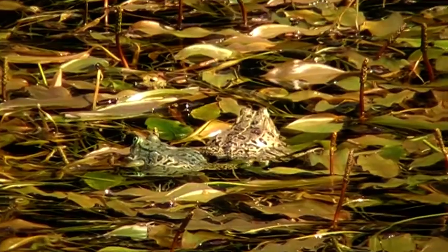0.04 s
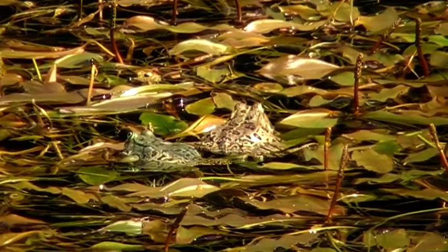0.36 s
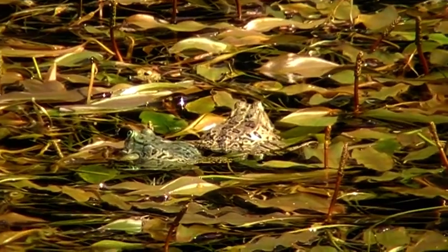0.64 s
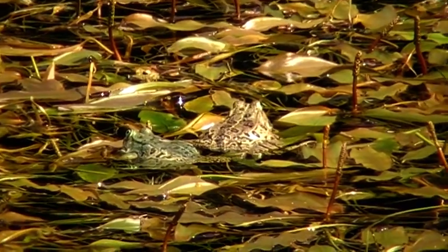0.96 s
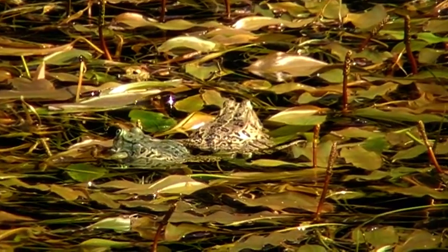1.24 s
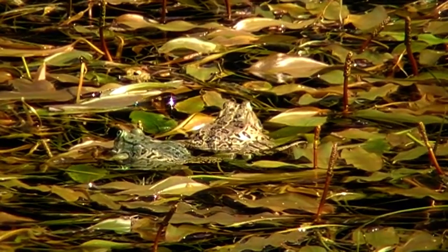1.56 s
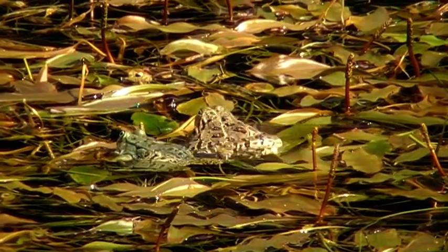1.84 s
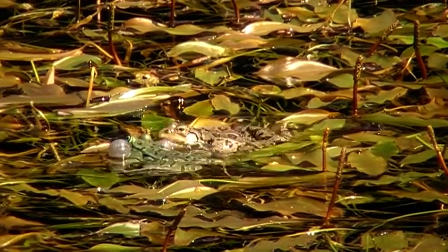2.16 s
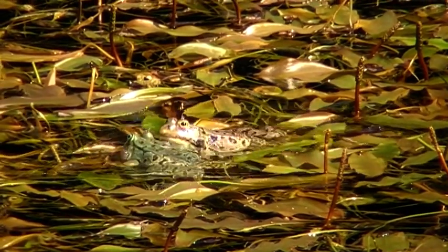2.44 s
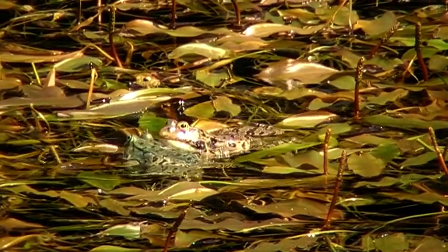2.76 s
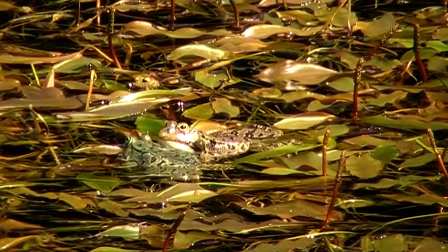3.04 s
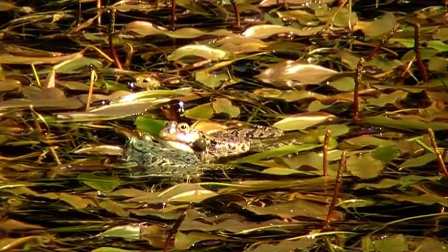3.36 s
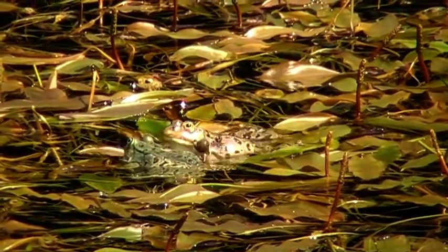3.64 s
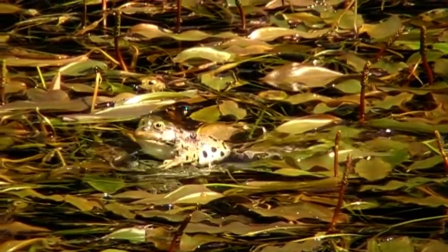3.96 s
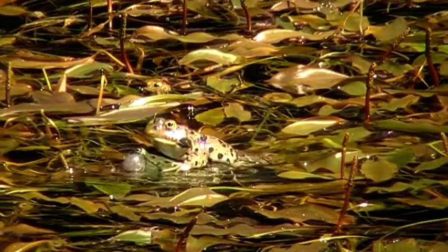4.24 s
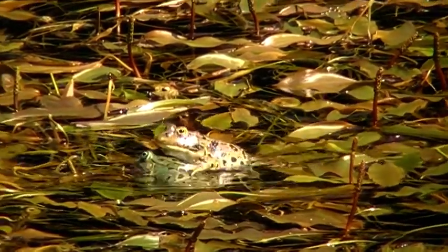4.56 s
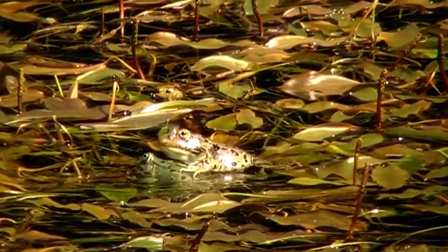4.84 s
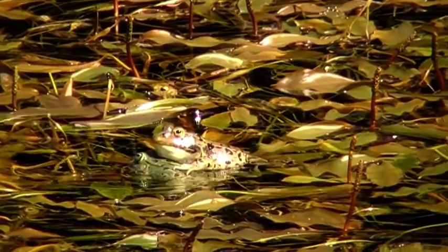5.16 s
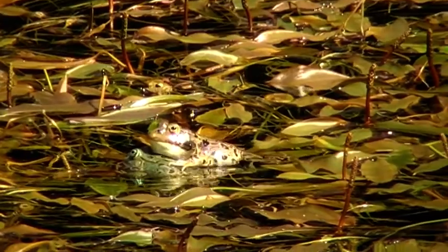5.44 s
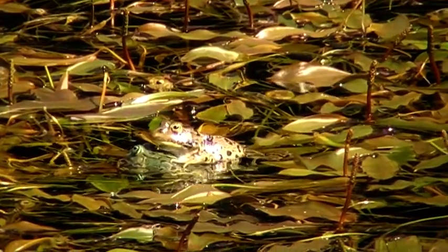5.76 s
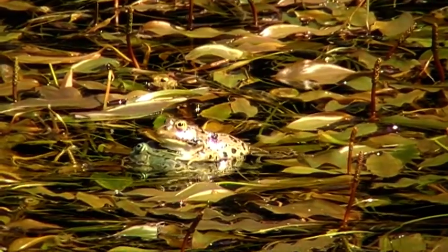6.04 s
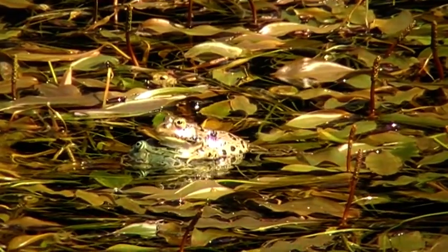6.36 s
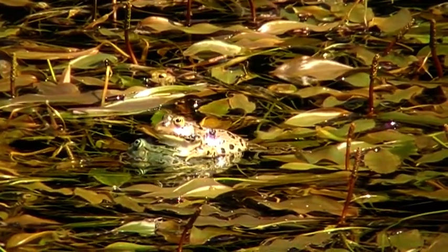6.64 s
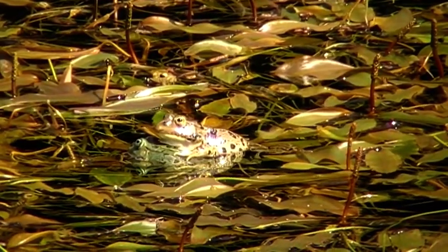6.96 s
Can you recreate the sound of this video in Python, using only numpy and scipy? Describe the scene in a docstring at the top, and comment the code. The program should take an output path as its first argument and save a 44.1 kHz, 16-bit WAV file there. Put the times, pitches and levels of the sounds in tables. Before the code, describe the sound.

Frogs call close by on a pond for about seven seconds, overlapping in short, pulsing bursts, several a second. Bright quacks and harsh, gritty croaks, most under a tenth of a second, dive in pitch, with softer low grunts between them. Quacks come thickest from 1.7 to 3.8 seconds and again from 6.2 to 6.6; croaks bunch up between 4.9 and 5.4. Slightly longer, wavering groans swell and turn husky around 0.9, 1.4, 2, 3.6, 4.1, 4.6, 5.9 and 7 seconds. Short sharp yelps pop out near 1.4, 3.3, 5.2 and 7.1. Behind them, distant frogs mutter steadily in a faint outdoor hush, and a thin, quiet, high whistle rises every second or two. The water stirs in tiny, barely audible fizzy splashes at about 6, 6.7 and 7 seconds. The banks give everything a soft, short echo.

```python
"""Water frogs call over one another on a weedy pond: bright quacks, harsh croaks, short yelps,
soft grunts and long swelling groans. Each call is a gliding train of larynx pulses that rings the
vocal sacs, with rasp from the throat and sizzle from the taut skin. Now and then a thin whistle rises.
More frogs mutter farther off in a faint hush, the water is stirred a few times near the end,
and the banks answer softly."""
import sys
import numpy as np
from scipy import signal
from scipy.fft import rfft, irfft, next_fast_len
from scipy.io import wavfile
from scipy.ndimage import uniform_filter1d, map_coordinates

SR = 44100
rng = np.random.default_rng(int(sys.argv[2]) if len(sys.argv) > 2 else 0)


def bounce(signal):
    """Save signal as a 16-bit WAV file at the path given by the first command-line argument."""
    frames = np.transpose(np.atleast_2d(signal))
    limited = np.clip(frames, -1, 1)
    pcm = np.round(limited * 32767).astype(np.int16)
    wavfile.write(sys.argv[1], SR, pcm)


N = 313551


def amp(db):
    """Decibels to gain."""
    return 10 ** (np.asarray(db) / 20)


def unit(x):
    """Scale to rms 1."""
    return x / np.sqrt(np.mean(x ** 2) + 1e-20)


def steady(x):
    """Ride the gain to hold rms 1 over a 20 ms window."""
    return x / np.sqrt(np.abs(uniform_filter1d(x * x, SR // 50)) + 1e-12)


def wobble(rate, n):
    """A smooth random curve of n samples, rate knots a second."""
    return map_coordinates(rng.standard_normal(int(n * rate / SR) + 4), [np.arange(n) * rate / SR])


def add(track, start_s, sound):
    """Mix a sound into a track."""
    part = track[max(int(start_s * SR), 0):][:len(sound)]
    part += sound[:len(part)]


def stereo(mid, side, side_db):
    """Mid and side to left and right."""
    return np.array([mid + amp(side_db) * side, mid - amp(side_db) * side])


def along(points, hz):
    """Read (Hz, value) points on a log frequency axis."""
    point_hz, values = np.transpose(points)
    return np.interp(np.log(hz + 1), np.log(point_hz + 1), values)


def filtered(x, response):
    """Apply a complex frequency response."""
    n = x.shape[-1]
    size = next_fast_len(n + SR // 20, True)
    return irfft(rfft(x, size) * response(np.fft.rfftfreq(size, 1 / SR)), size)[..., :n]


def eq(x, points, size=4096):
    """Minimum-phase EQ through (Hz, dB) points."""
    grid = np.fft.rfftfreq(size, 1 / SR)
    cepstrum = irfft(np.log(amp(along(points, grid))))
    cepstrum[1:size // 2] *= 2
    cepstrum[size // 2 + 1:] = 0
    gain = np.exp(rfft(cepstrum))
    return filtered(x, lambda hz: np.interp(hz, grid, gain))


def ring(x, centre_hz, width_hz):
    """One resonance whose centre moves from sample to sample."""
    turn = np.exp(2j * np.pi * np.cumsum(centre_hz) / SR)
    pole = np.exp(-np.pi * width_hz / SR)
    return 2 * np.real(turn * signal.lfilter([1 - pole], [1, -pole], x / turn))


def resonances(x, modes, stretch, scatter):
    """Parallel resonances that bend with stretch and differ a little in each call."""
    chance = rng.standard_normal((len(modes), 2))
    return sum((-1) ** k * amp(db + 2 * trim) * ring(x, hz * stretch * (1 + scatter * detune), width)
               for k, ((hz, width, db), (detune, trim)) in enumerate(zip(modes, chance)))


# Tone of the ambience bed: (frequency [Hz], gain [dB])
AIR_EQ = [(25, -21), (70, -8), (160, 0.5), (400, 14), (1500, -31), (3500, -7.5), (5000, -10.5),
          (9000, -13.5), (15000, -37)]

def air(level_db, side_db):
    """Faint outdoor hush: a wide bed of dark noise."""
    mid, side = unit(filtered(rng.standard_normal((2, N)), lambda hz: amp(along(AIR_EQ, hz))))
    return amp(level_db) * stereo(mid, side, side_db)


def larynx(pitch, rough):
    """Pulses at the pitch: clean while the cords are taut, uneven and airy as they slacken."""
    n = len(pitch)
    cycles = np.cumsum(pitch) / SR
    slack = rough * np.clip((440 - pitch) / 200, .12, 1)
    beats = np.arange(int(cycles[-1]) + 1) + .3
    jitter, shimmer = rng.standard_normal((len(beats), 2)).T * np.interp(beats, cycles, slack)
    when = np.interp(beats + .14 * jitter, cycles, np.arange(n))
    # windowed sinc clicks can land between samples
    taps = when.astype(int)[:, None] + np.arange(-7, 9)
    offset = taps - when[:, None]
    clicks = np.sinc(offset) * np.cos(np.pi * offset / 16) ** 2 * amp(2.6 * shimmer)[:, None]
    pulses = np.bincount(np.clip(taps, 0, n - 1).ravel(), clicks.ravel(), n)
    # air rushes through once a cycle, just after the cords open
    rush = rng.standard_normal(n) * np.exp(-3 * ((cycles - beats[0]) % 1))
    return unit(pulses) + .4 * slack * unit(rush)


def off_leaves(x, strength, count=3):
    """Floating leaves and the water throw back early reflections, different for every call."""
    bounces = rng.uniform([.0006, -1], [.005, 1], (count, 2))
    return x + strength * sum(gain * np.pad(x, (int(delay * SR), 0))[:len(x)] for delay, gain in bounces)


# Low body colour shared by all frogs: (frequency [Hz], gain [dB])
BODY_EQ = [(30, -57), (120, -51.5), (230, -23.5), (300, -3.5), (355, 5), (420, -5), (490, -6.5), (650, 3),
           (780, -2.5), (1050, 0), (1750, -5), (2100, -13), (2800, -46.5), (5000, -52)]
# Presence band of the throat rasp: (frequency [Hz], gain [dB])
RASP_EQ = [(300, -50), (1700, -15.5), (2250, -11.5), (3300, -4), (3900, -11.5), (5500, -29.5),
           (9000, -43.5)]
# Narrow resonances of the taut sac skin: (frequency [Hz], width [Hz], gain [dB])
SKIN_MODES = [(5050, 400, -11.5), (7370, 210, 1), (8330, 61, 6), (9650, 150, -1.5), (11300, 42, 1)]
# Top-end band of the skin sizzle: (frequency [Hz], gain [dB])
SIZZLE_EQ = [(2000, -24), (4500, 6), (11300, 3), (15500, -30)]

def call(length, sac_hz, peak_db, first_hz, crest, *, throat, roughness, swell_db, fade_db, hold, fall,
         rasp_db, sizzle_db, sac_width_hz, coupling, push_bend, drift, attack_s, release_s, waver=0):
    """One call: larynx pulses ring the sacs for body, the throat for rasp and the skin for sizzle."""
    t = np.arange(int((length + 2 * release_s) * SR)) / SR
    progress = t / length
    # the push swells to its crest and fades; both slopes are in dB per call length
    push_db = -swell_db * np.maximum(crest - progress, 0) - fade_db * np.maximum(progress - crest, 0)
    # the pitch holds for a share of the call, then falls and roughens as the air runs out
    spent = np.maximum(progress - hold, 0) / max(1 - hold, .1)
    rough = np.interp(spent, [0, 1], roughness)
    push_db += 1.5 * rough * wobble(80, len(t))
    wander = .04 * rough * wobble(60, len(t)) + waver * wobble(30, len(t))
    pitch = first_hz * fall ** spent * np.exp(wander)
    source = off_leaves(larynx(pitch, rough), strength=.2 + .35 * rough.mean())
    # the sacs ring higher under a harder push and drift as they fill; one sac drives the other
    sac_bend = push_bend * push_db + drift * (progress - .5) + waver / 2 * wobble(40.4, len(t))
    centre_hz = sac_hz * np.exp(sac_bend)
    first_sac = ring(source, centre_hz, sac_width_hz)
    body = eq(first_sac + coupling * ring(first_sac, centre_hz, sac_width_hz), BODY_EQ)
    # the higher resonances sag with the pitch
    stretch = (pitch / pitch.mean()) ** .12
    rasp = eq(resonances(source, throat, np.sqrt(stretch), scatter=.02), RASP_EQ)
    sizzle = eq(resonances(source, SKIN_MODES, stretch, scatter=.04), SIZZLE_EQ)
    # tension, in octaves above a middling call, brightens the tone; a soft push dulls it
    cord_tension, skin_tension = np.log2(first_hz / 450), np.log2(sac_hz / 1500)
    dulling_db = .25 * push_db
    rasp_gain = amp(rasp_db + 13.5 * (cord_tension + skin_tension) / 2 + dulling_db)
    sizzle_gain = amp(sizzle_db + 29.5 * skin_tension + dulling_db)
    voice = steady(body) + rasp_gain * steady(rasp) + sizzle_gain * steady(sizzle)
    gate = (1 - np.exp(-t / attack_s)) * np.clip((t[-1] - t) / (2 * release_s), 0, 1) ** 2
    return gate * amp(peak_db + push_db) * voice


def frog(cues, **voice):
    """Play a cue list of calls in one voice."""
    track = np.zeros(N)
    for start_s, *cue in cues:
        add(track, start_s, call(*cue, **voice))
    return track


# Throat resonances of grunts, groans and far frogs: (frequency [Hz], width [Hz], gain [dB])
GROAN_THROAT = [(2280, 810, 9), (3280, 140, -7.5)]
# Grunt cues: (time [s], length [s], sac resonance [Hz], crest level [dB])
GRUNTS = [(0, 0.044, 1037, -26), (.353, .022, 1250, -28.5), (.46, 0.052, 1174, -29.5),
          (.6, 0.075, 1090, -31), (.752, 0.052, 1356, -30), (1.39, 0.1, 1210, -27.5),
          (1.825, 0.043, 1060, -33.5), (1.97, 0.066, 1245, -24.5), (2.607, .052, 976, -36.5),
          (2.76, 0.038, 1170, -31.5), (2.89, 0.077, 1200, -29.5), (3.042, 0.098, 1306, -21),
          (3.42, 0.074, 1085, -26.5), (3.815, 0.037, 1274, -25), (4.265, 0.081, 1255, -24.5),
          (4.365, 0.054, 1144, -37), (4.455, 0.015, 1090, -25.5), (4.492, 0.031, 1038, -30.5),
          (5.335, 0.042, 1345, -22), (5.59, 0.047, 1190, -32), (6.857, .045, 1134, -29)]

def grunts():
    """Soft low grunts: a nearly even push into well-damped sacs."""
    return frog(GRUNTS, throat=GROAN_THROAT, roughness=(.4, .65), rasp_db=-17, sizzle_db=-35.5,
                first_hz=361.8, hold=.1, fall=.68,
                crest=.24, swell_db=4, fade_db=4.5, attack_s=.003, release_s=.0029,
                sac_width_hz=305, coupling=.33, push_bend=.039, drift=.16)


# Throat resonances of a quack: (frequency [Hz], width [Hz], gain [dB])
QUACK_THROAT = [(2304, 220, 11), (2925, 216, 4)]
# Quack cues:
# (time [s], length [s], sac resonance [Hz], crest level [dB], start pitch [Hz], crest [share of length])
QUACKS = [(.035, 0.082, 1250, -19.5, 350, 0.24), (.668, 0.097, 1384, -23, 431.7, 0.22),
          (.812, 0.097, 1760, -19, 568, 0.32), (1.008, 0.052, 1646, -14, 502.4, 0.11),
          (1.73, .075, 1590, -20, 452.7, 0.43), (1.875, 0.086, 1740, -16.5, 589, 0.39),
          (2.075, 0.043, 1750, -13.5, 549, 0.28), (2.205, 0.055, 1380, -20.5, 546.7, .3),
          (2.652, .072, 1618, -21, 511, 0.43), (2.79, 0.076, 1760, -17, 630, 0.38),
          (2.971, .062, 1767, -15, 625, 0.25), (3.145, 0.046, 1716, -11.5, 591, 0.31),
          (3.55, 0.082, 1530, -18.5, 481, 0.55), (3.688, 0.063, 1486, -15, 558, 0.62),
          (3.835, 0.057, 1770, -16, 548, 0.53), (4.21, .07, 1296, -24.5, 568.4, 0.37),
          (5.385, 0.038, 1710, -11.5, 526, 0.37), (6.158, .074, 1523, -18.5, 403.5, 0.29),
          (6.302, .066, 1670, -15, 450, 0.46), (6.471, 0.051, 1775, -14, 490, 0.19),
          (6.633, 0.039, 1807, -16, 472.7, 0.3)]

def quacks():
    """Bright quacks: taut cords dive an octave, with plenty of bite from the throat."""
    return frog(QUACKS, throat=QUACK_THROAT, roughness=(.4, .65), rasp_db=-9.5, sizzle_db=-37,
                hold=.03, fall=.5, swell_db=12.5, fade_db=14.5, attack_s=.0027, release_s=.0031,
                sac_width_hz=185, coupling=.36, push_bend=.00092, drift=.033)


def far_frogs(level_db, count=70):
    """A loose mutter of distant croaks, rough and soft-edged."""
    cues = [((k + late) * N / SR / count, .08 + .048 * long, 1050 + 500 * sac, level_db, 340 + 120 * high)
            for k, (late, long, sac, high) in enumerate(rng.random((count, 4)))]
    return frog(cues, throat=GROAN_THROAT, roughness=(1, 1), rasp_db=-16, sizzle_db=-37,
                hold=0, fall=.63, crest=1, swell_db=3, fade_db=11.5, attack_s=.063, release_s=.028,
                sac_width_hz=1400, coupling=0, push_bend=0, drift=0)


# Throat resonances of croaks and yelps: (frequency [Hz], width [Hz], gain [dB])
CROAK_THROAT = [(2210, 730, -1.6), (3567, 118, 0.65)]
# Croak cues:
# (time [s], length [s], sac resonance [Hz], crest level [dB], start pitch [Hz], crest [share of length])
CROAKS = [(.198, .075, 1430, -21.5, 407.6, 0.53), (.374, .067, 1420, -15.5, 508.5, .1),
          (.539, .047, 1300, -19, 467.6, 0.14), (1.203, .074, 1517, -20.5, 526.7, 0.29),
          (2.188, 0.083, 1410, -16, 402.6, 0.32), (2.377, 0.063, 1323, -18, 458.3, .1),
          (3.192, .143, 1310, -14.5, 333.5, 0.25), (3.992, .075, 1490, -13.5, 496.2, .1),
          (4.166, 0.087, 1336, -16.5, 443.5, 0.077), (4.893, .095, 1404, -21.5, 325.5, .55),
          (5.043, 0.064, 1800, -14, 463, 0.38), (5.097, 0.056, 1590, -15, 276.7, 0.12),
          (5.215, .057, 1700, -11.5, 477, 0.28), (5.26, 0.059, 1270, -22, 370.2, 0.11),
          (5.425, .095, 1163, -21.5, 336.6, 0.12), (5.718, .06, 1236, -29.5, 373, 0.36),
          (6.704, 0.11, 1306, -26.5, 402.6, 0.71), (6.908, .102, 1550, -17.5, 492.6, 0.13)]

def croaks():
    """Harsh croaks: the pulses turn gritty as the cords slacken by more than an octave."""
    return frog(CROAKS, throat=CROAK_THROAT, roughness=(.75, 1), rasp_db=-16, sizzle_db=-45,
                hold=.03, fall=.44, swell_db=7.5, fade_db=11.5, attack_s=.0028, release_s=.0027,
                sac_width_hz=195, coupling=.1, push_bend=.0018, drift=.1)


# Whistle cues: (time [s], length [s], top pitch [Hz], level [dB])
WHISTLES = [(.25, .22, 3790, -54), (1.16, 0.22, 3820, -53.5), (2.02, 0.22, 3760, -50),
            (4.003, 0.14, 3710, -51.5), (4.774, 0.29, 3793, -53.5), (5.722, .27, 3790, -52.5),
            (6.74, 0.22, 3650, -49)]

def whistles(climb_hz=215):
    """A thin, slightly unsteady tone climbs, holds and fades."""
    track = np.zeros(N)
    for start_s, length, top_hz, db in WHISTLES:
        progress = np.linspace(0, 1, int(length * SR))
        hz = np.interp(progress, [0, .5], [top_hz - climb_hz, top_hz]) + 22 * wobble(300, len(progress))
        swell = np.sin(np.pi * progress) * amp(2 * wobble(60, len(progress)))
        tone = np.sin(2 * np.pi * np.cumsum(hz) / SR)
        add(track, start_s, amp(db) * unit(swell * tone))
    return track


# Groan cues: (time [s], length [s], sac resonance [Hz], crest level [dB], start pitch [Hz])
GROANS = [(.92, 0.19, 1230, -20, 342.2), (1.42, .195, 1210, -17, 319.4), (2.02, .19, 1233, -17, 329),
          (3.635, 0.14, 1247, -16.5, 308.6), (4.075, 0.17, 1150, -22.5, 294.4), (4.6, .2, 1174, -23, 311.7),
          (5.862, .178, 1145, -21, 285.1), (6.99, 0.13, 1220, -20, 337.3)]

def groans():
    """Long wavering groans: the sacs sweep up as they fill, then the pitch drops and turns husky."""
    return frog(GROANS, throat=GROAN_THROAT, roughness=(.35, .85), rasp_db=-13.5, sizzle_db=-30,
                hold=.6, fall=.54, waver=.09,
                crest=.74, swell_db=19, fade_db=19.5, attack_s=.005, release_s=.0035,
                sac_width_hz=216, coupling=.7, push_bend=.0088, drift=.29)


# Yelp cues: (time [s], length [s], sac resonance [Hz], crest level [dB])
YELPS = [(1.352, .036, 1190, -16), (3.342, .038, 1180, -14), (5.192, 0.027, 1350, -16),
         (7.064, 0.032, 1320, -12.5)]

def yelps():
    """Short yelps: one sharp push at a nearly level pitch."""
    return frog(YELPS, throat=CROAK_THROAT, roughness=(.4, .65), rasp_db=-16, sizzle_db=-39,
                first_hz=429, hold=.3, fall=.84,
                crest=.41, swell_db=16, fade_db=18, attack_s=.0051, release_s=.0023,
                sac_width_hz=270, coupling=.17, push_bend=.002, drift=.045)


# Splash cues: (time [s], length [s], level [dB])
SPLASHES = [(5.975, 0.065, -56.5), (6.746, 0.072, -56.5), (7.041, 0.12, -51.5)]

def splashes(bubbles=140):
    """Stirred water: a spray of tiny bursting bubbles, each a high ping."""
    track = np.zeros(N)
    t = np.arange(SR // 200) / SR
    for start_s, length, db in SPLASHES:
        spray = np.zeros(int(length * SR) + len(t))
        for when, height, strength in rng.random((bubbles, 3)):
            hz = 4000 * 2.1 ** height
            ping = np.sin(2 * np.pi * hz * t) * np.exp(-hz * t / 5)
            add(spray, length * when, strength ** 3 * ping)
        add(track, start_s, amp(db) * unit(spray))
    return track


# Reverb of the banks: (frequency [Hz], time to fall 60 dB [s])
BANK_DECAY = [(300, 0.69), (1500, 0.5), (3500, 0.7), (10000, 0.36)]

def banks(x, side_db, bloom_s):
    """Reeds and banks scatter a soft tail, a little different at each ear."""
    hz, t, noise = signal.stft(rng.standard_normal((2, SR)), SR, nperseg=256)
    bloom = 1 - np.exp(-t / bloom_s)
    decay = amp(-60 * t / along(BANK_DECAY, hz)[:, None])
    tail = signal.istft(noise * bloom * decay, SR, nperseg=256)[1]
    mid, side = signal.fftconvolve(x[None], tail / np.linalg.norm(tail[0]), axes=1)[:, :N]
    return stereo(mid, side, side_db)


def scene():
    """Near calls and splashes up front, whistles and far frogs wetter behind, all over the hush."""
    near = quacks() + croaks() + yelps() + groans() + grunts() + splashes()
    faint = whistles() + far_frogs(level_db=-47)
    echo = banks(near + 2 * faint, side_db=-12, bloom_s=.0095)
    return near + faint + amp(-13) * echo + air(level_db=-63, side_db=-1.5)


# Balance between the microphones: (frequency [Hz], left minus right [dB])
MIC_BALANCE = [(300, -2), (1100, -2.5), (1600, -4.5), (2300, -1.5), (2900, 0.5), (4500, -1)]
# Phase between the microphones: (frequency [Hz], left lead [rad])
MIC_PHASE = [(1400, 0.037), (2000, 0.089), (2700, 0.78), (3450, 0.38)]

def record(dry, ceiling=.97, top_hz=15750):
    """Two microphones colour the sound differently; peaks are soft-clipped and the very top is cut."""
    def microphones(hz):
        left_over_right = amp(along(MIC_BALANCE, hz)) * np.exp(1j * along(MIC_PHASE, hz))
        return left_over_right ** np.array([[.5], [-.5]])
    coloured = filtered(dry, microphones)
    rounded = coloured / (1 + np.abs(coloured / ceiling) ** 8) ** (1 / 8)
    return filtered(rounded, lambda hz: hz < top_hz)


dry = scene()
out = record(dry)
bounce(out)
```